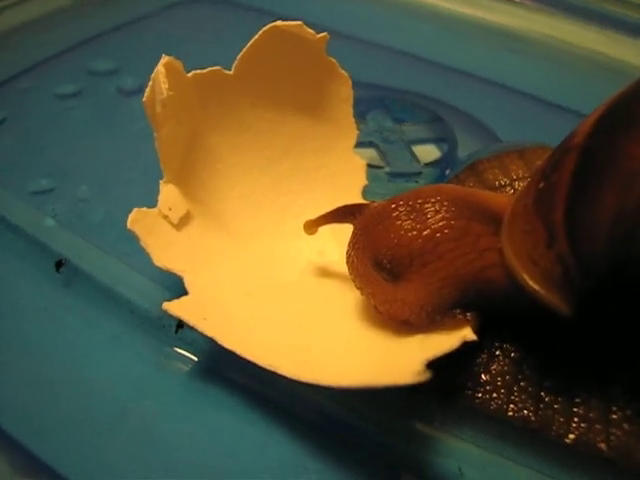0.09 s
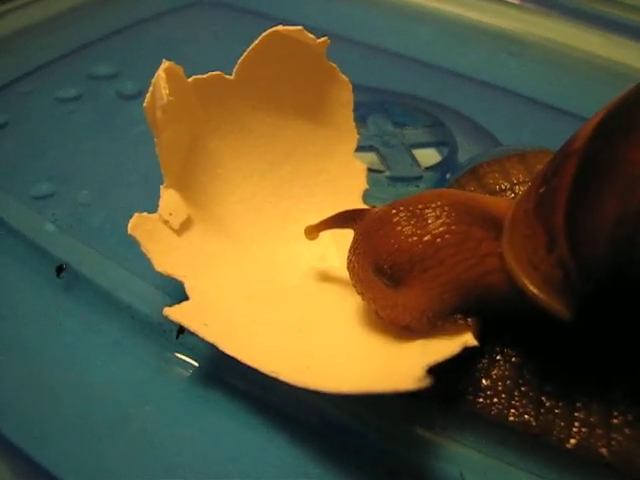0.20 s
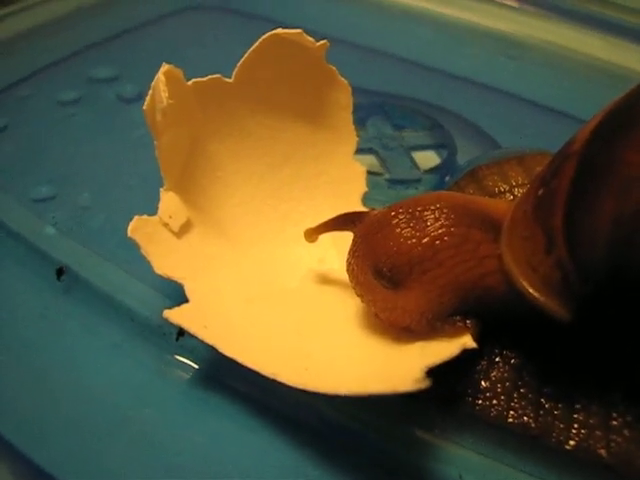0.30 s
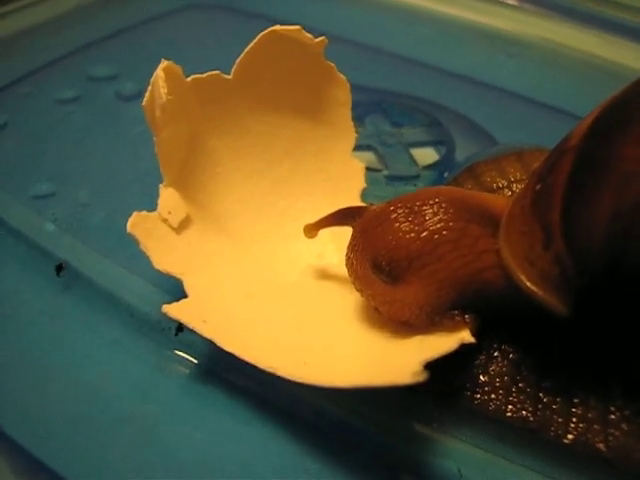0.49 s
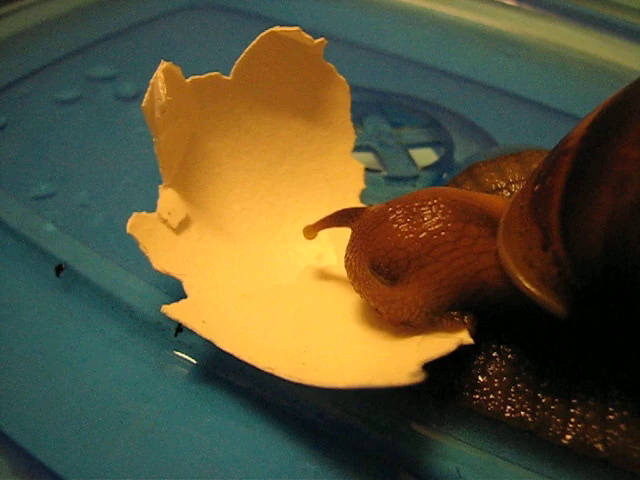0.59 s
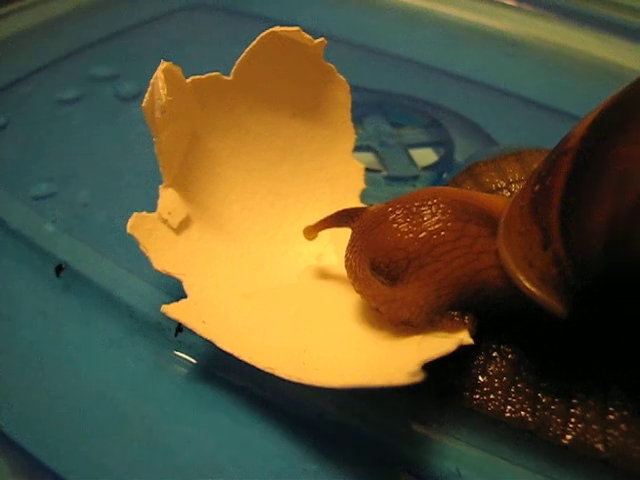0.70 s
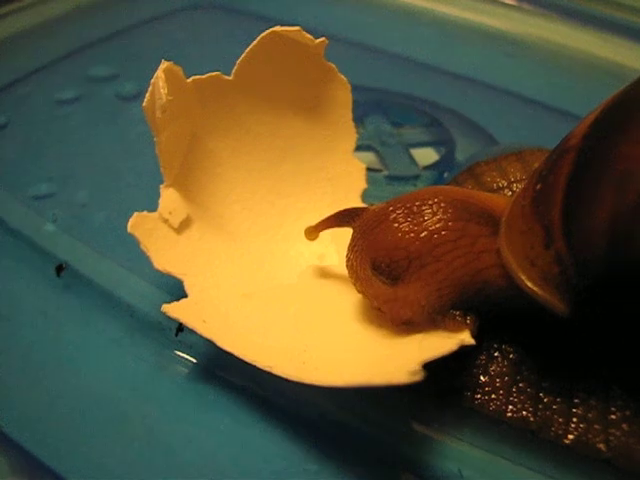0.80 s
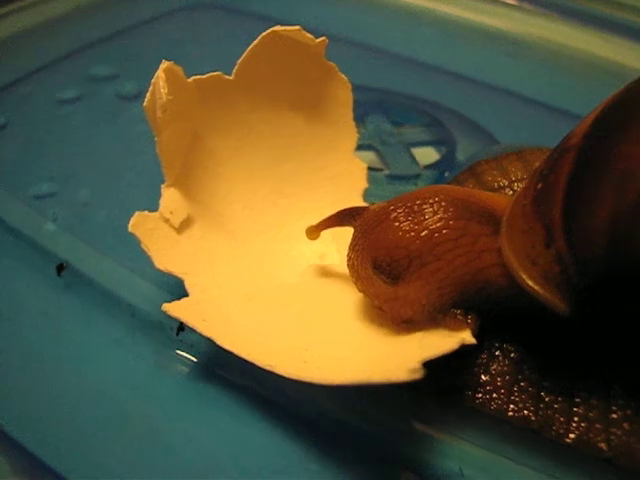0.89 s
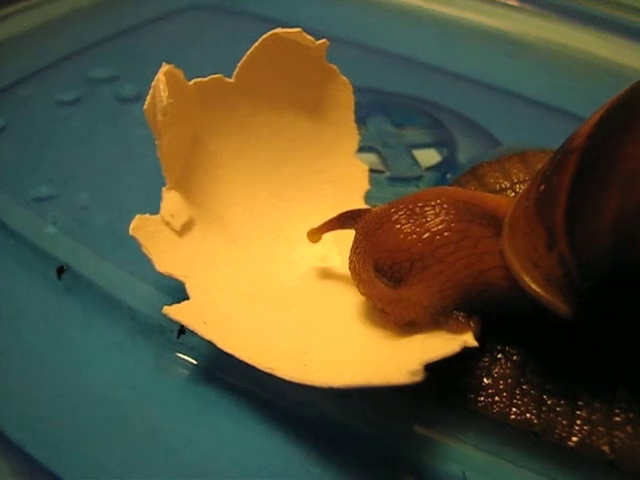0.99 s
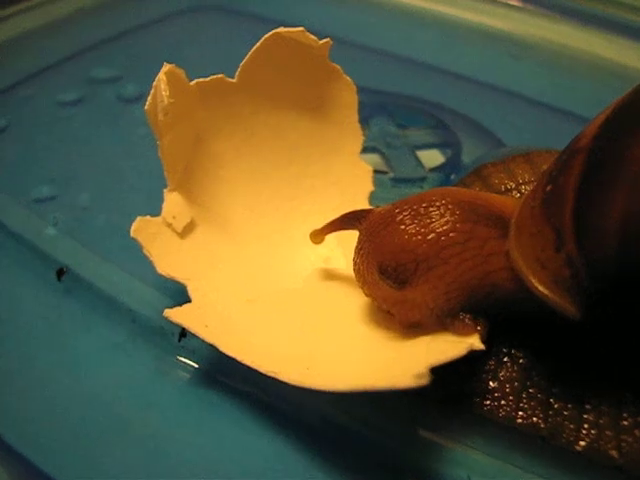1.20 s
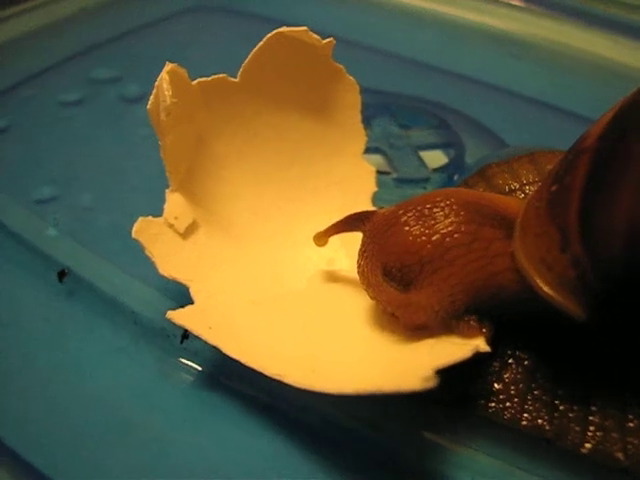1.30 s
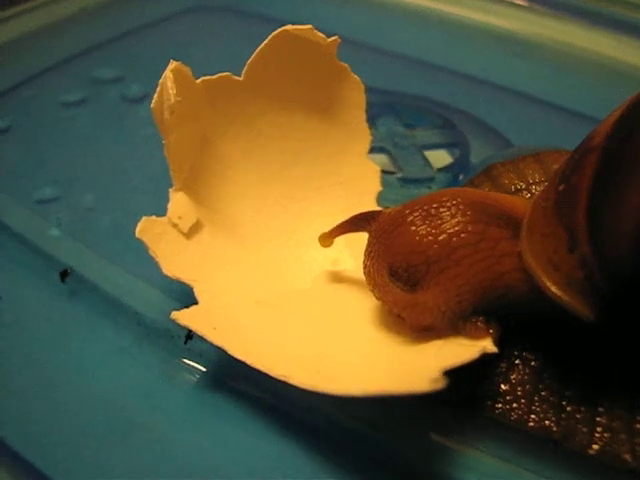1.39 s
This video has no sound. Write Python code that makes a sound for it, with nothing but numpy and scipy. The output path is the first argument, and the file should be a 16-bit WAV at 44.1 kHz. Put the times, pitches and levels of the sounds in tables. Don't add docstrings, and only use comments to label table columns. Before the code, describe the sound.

Close small-camera stereo sound of a snail scraping eggshell: faint motor ticks first, then a cluster of sharp brittle snaps with fine grit, hollow plastic taps, and near quiet with a late double click and soft thuds over hiss.

```python
import sys
import numpy as np
from scipy import signal
from scipy.fft import rfft, irfft
from scipy.io import wavfile

SR = 44100
rng = np.random.default_rng(int(sys.argv[2]) if len(sys.argv) > 2 else 0)


def put_to_file(sound):
    columns = np.atleast_2d(sound).T
    safe = np.clip(columns, -1, 1)
    whole_steps = np.round(safe * 32767)
    wavfile.write(sys.argv[1], SR, whole_steps.astype(np.int16))


def makeup_ratio(level_db):
    decades = np.asarray(level_db, float) / 20
    return 10 ** decades


N = 61740

# (frequency [Hz], level [dB], t60 [s], left-right [dB], left lead [rad])
SHELL_LOW = [(1720, -9, .02, -4, .8), (2130, -13, .01, -4, .8), (2850, -7, .007, -4, .8),
             (3300, -1, .008, -4, .8), (3850, -1, .006, -4, .8)]
SHELL_MID = [(4720, -1, .007, -3, .9), (5240, 0, .007, -3, .9)]
SHELL_MAIN = [(6090, -4, .008, -3.5, .95), (6280, 0, .009, -3.5, .95), (6490, -4, .008, -3.5, .95),
              (7180, -13, .005, -3, .95)]
SHELL_HIGH = [(9150, 0, .005, -3, .8), (10500, -3, .004, -1, 1.2), (12400, -6, .003, 4, 1.6),
              (14300, -8, .003, 4, 1.6)]


def evened(x):
    return x / np.sqrt(np.mean(x ** 2) + 1e-20)


def read(points, hz):
    f, value = np.transpose(points)
    return np.interp(np.log(hz + 1), np.log(f + 1), value)


def panned(left_right_db):
    return makeup_ratio(np.array([[0.5], [-0.5]]) * left_right_db)


def lead_left(rad):
    return np.exp(1j * np.array([[rad], [0]]))


def add(mix, s, sound):
    part = mix[:, round(s * SR):][:, :sound.shape[1]]
    part += sound[:, :part.shape[1]]


def cut(x, hz, kind):
    return signal.sosfilt(signal.butter(3, hz, kind, fs=SR, output="sos"), x)


def ring(modes, detune=0.004, spread_db=1.4):
    t = np.arange(4096) / SR
    out = 0
    for hz, db, t60_s, left_right_db, lead_rad in modes:
        off_pitch, off_level = rng.standard_normal(2)
        phase = 2 * np.pi * hz * (1 + detune * off_pitch) * t + np.array([[0.5], [-0.5]]) * lead_rad
        decay = makeup_ratio(db + spread_db * off_level - 60 * t / t60_s)
        out = out + panned(left_right_db) * decay * np.sin(phase)
    return out / np.sqrt(sum(makeup_ratio(mode[1]) ** 2 for mode in modes))


def hiss():
    # (frequency [Hz], density [dB per Hz])
    colour = [(15, -48), (25, -10.5), (238, -4), (409, -0.5), (481, -5), (6860, -14.5), (7860, -8),
              (8760, -14.5), (16400, -26)]
    # (frequency [Hz], correlation [0-1])
    likeness = [(60, 0.42), (240, 0.71), (950, 0.34), (3770, 0.24), (15000, 0.099)]
    # (frequency [Hz], left-right [dB])
    balance = [(60, 1), (3000, -0.5), (15000, 0)]
    hz = np.fft.rfftfreq(N, 1 / SR)
    left, other = rfft(rng.standard_normal((2, N)))
    same = read(likeness, hz)
    right = same * left + np.sqrt(1 - same ** 2) * other
    spectrum = np.array([left, right]) * makeup_ratio(read(colour, hz)) * panned(read(balance, hz))
    return makeup_ratio(-48.5) * evened(irfft(spectrum, N))


def hum():
    # (centre [Hz], width [Hz], level [dB], left-right [dB])
    resonances = [(99, 51, -65.5, -4), (398.6, 56, -63.5, 16), (598, 24, -72.5, 19), (1000, 290, -64, -4),
                  (6330, 220, -77.5, -17), (8300, 420, -75, 0)]
    hz = np.fft.rfftfreq(N, 1 / SR)
    out = 0
    for centre_hz, width_hz, db, left_right_db in resonances:
        band = rfft(rng.standard_normal(N)) / (1 + (2 * (hz - centre_hz) / width_hz) ** 2)
        out = out + makeup_ratio(db) * panned(left_right_db) * evened(irfft(band, N))
    return out


def whine():
    pictures_per_s, flip_s, late_s = 30 / 1.001, 0.0226, 0.0172
    lower_hz, upper_hz, buzz_hz, buzz_t60_s = 7867.15, 8265, 8620, 0.006
    t = np.arange(N) / SR

    def flips(start_s):
        return np.tanh(np.sin(np.pi * pictures_per_s * (t - start_s)) / 0.03)

    lower = flips(flip_s) * makeup_ratio(-47) * panned(-2.2) * np.sin(2 * np.pi * lower_hz * t)
    late = flips(flip_s + late_s)
    turn = np.exp(2j * np.pi * upper_hz * t)
    upper = makeup_ratio(-55.3) * late * turn * lead_left(3.9)
    short_t = t[:900]
    strike = makeup_ratio(-50.5 - 60 * short_t / buzz_t60_s) * np.exp(2j * np.pi * buzz_hz * short_t)
    buzz = signal.fftconvolve(np.gradient(np.sign(late)) * turn, strike)[:N] * lead_left(2.4)
    return lower + (upper + buzz).real


def drag():
    # (time [s], level [dB])
    loudness = [(0.0, -49.5), (0.288, -49.5), (0.42, -46), (0.466, -42), (0.612, -50), (0.69, -46.5),
                (0.838, -83), (1.4, -82)]
    grains_per_s, spread_db = 1500, 3.5
    strength = makeup_ratio(spread_db * np.minimum(rng.exponential(1, N), 3))
    grit = strength * (rng.random(N) < grains_per_s / SR) * rng.choice([-1, 1], N)
    shell = ring(SHELL_MAIN) + ring(SHELL_LOW + SHELL_MID) + makeup_ratio(-9.5) * ring(SHELL_HIGH)
    scrape = evened(signal.fftconvolve(shell, grit[None], axes=1)[:, :N])
    s, db = np.transpose(loudness)
    return scrape * makeup_ratio(np.interp(np.arange(N) / SR, s, db) - 4)


def motor_ticks():
    # (time [s], level [dB])
    steps = [(.002, -37.5), (.105, -40.5), (.202, -36), (.301, -40), (.402, -35), (.503, -48.5),
             (.598, -46.5), (.721, -40), (1.052, -42.5)]
    # (frequency [Hz], level [dB], t60 [s], left-right [dB], left lead [rad])
    case_modes = [(392.6, 0, 0.086, 8.1, 0.14), (590, -9.5, 0.032, 0.91, 0.82)]
    rise_s = 0.003
    rise = np.minimum(np.arange(4096) / SR / rise_s, 1)
    out = np.zeros((2, N))
    for s, db in steps:
        add(out, s, makeup_ratio(db) * rise * ring(case_modes))
    return out


def sharp_edges():
    # (time [s], level [dB], top [dB])
    cracks = [(.0218, -50, -6), (.3901, -33, 10), (.4485, -37, -6), (.6117, -29, 12), (.6134, -31, 12),
              (.6916, -44, -8), (.7381, -31, -7), (.7787, -25, 3), (1.051, -44, -6), (1.1132, -42, -10)]
    # (frequency [Hz], level [dB], t60 [s], left-right [dB], left lead [rad])
    body = [(1750, -2, .004, -6, 1), (2300, -2, .004, -5, .8), (3250, 0, .004, -5, .8)]
    top = [(4200, -1, .003, -3, .9), (5300, 0, .003, -3, .9), (6800, 0, .003, -3, .9),
           (10500, -11, .0015, -2, 1)]
    out = np.zeros((2, N))
    for s, db, top_db in cracks:
        add(out, s, -makeup_ratio(db) * (ring(body) + makeup_ratio(top_db) * ring(top)))
    return out


def tray_knocks():
    # (time [s], level [dB], brightness [dB])
    blows = [(0.0226, -36.5, 3), (0.391, -50.5, 6), (0.5104, -48, -3), (0.6161, -46, 9), (0.6357, -47, 11),
             (0.6471, -50, 12.5), (0.6672, -41, 11), (0.6923, -36, 6.5), (0.7014, -53, 12.5),
             (0.71, -49, 9), (0.7203, -53, 12.5), (0.7384, -34, 8), (0.7786, -30.5, 8), (1.051, -51, 9.5),
             (1.249, -64, 7)]
    # (frequency [Hz], level [dB], t60 [s], left-right [dB], left lead [rad])
    dull = [(163, -0.5, 0.02, -24, 0.15), (405.2, -0.5, 0.12, 12.5, 1), (603, 8.5, 0.068, 3.5, 0.91)]
    bright = [(995, 0, .042, -9, 1.5), (1095, -3, .035, -9, 1.5), (1380, -7, .022, -10, 1.5),
              (770, -14, .011, -6, 1.2)]
    out = np.zeros((2, N))
    for s, db, bright_db in blows:
        add(out, s, -makeup_ratio(db - 1) * (ring(dull) + makeup_ratio(bright_db - 1.5) * ring(bright)))
    return out


def slip(level_db, low_db, mid_db, high_db):
    trail_s, contact_s = 0.0006, 0.00027
    t = np.arange(200) / SR
    burst = 0.2 * rng.standard_normal(200) * (rng.random(200) < 0.3) * np.exp(-t / trail_s)
    burst[0] = 1
    soft = 1 - np.exp(-(np.arange(1500) / SR / contact_s) ** 2)
    families = [(SHELL_MAIN, 0, 0.004, 1.4), (SHELL_LOW, low_db + 0.3, 0.012, 2),
                (SHELL_MID, mid_db, 0.012, 2), (SHELL_HIGH, high_db - 1.6, 0.012, 2)]
    out = 0
    for modes, db, detune, spread_db in families:
        rung = soft * ring(modes, detune, spread_db)[:, :1500]
        part = signal.fftconvolve(rung, burst[None], axes=1)
        onset_rms = np.sqrt(np.mean(part.mean(0)[:88] ** 2))
        out = out + makeup_ratio(db) * part / onset_rms
    return makeup_ratio(level_db - 2) * out


def rasp_slips():
    # (time [s], level [dB], low modes [dB], middle modes [dB], high modes [dB])
    strong = [(0.2346, -22, -13, -16, -14), (0.2795, -29.5, -16, -13, -13), (0.3127, -26.3, -19, -12, -22),
              (0.3451, -22, -15, -17, -19), (0.39, -26, -2, 2, -4), (0.3914, -28, -9, -6, -12),
              (0.3928, -28, -14, -14, -20), (0.4248, -30, -13, -14, -13), (0.4481, -29.2, -4, -10, -8),
              (0.4703, -27.8, -11, -18, -13), (0.4732, -33, -14, -19, -17), (0.4766, -23.4, -15, -18, -15),
              (0.5087, -21.7, -12, -21, -18), (0.5149, -26.8, -15, -18, -20),
              (0.5454, -26.3, -16, -13, -12), (0.5842, -29.7, -8, -14, -15), (0.6097, -14.5, -11, -12, -16),
              (0.6116, -19.5, -4, -2, -9), (0.6134, -17.5, -11, -8, -16), (0.6279, -23, -12, -10, -15),
              (0.6293, -22.5, -21, -15, -18), (1.1036, -28.5, -14, -14, -20), (1.1116, -35, -10, -8, -14),
              (1.113, -31.2, -7, -11, -16)]
    # (time [s], level [dB])
    faint = [(0.1871, -50), (0.2231, -34), (0.2399, -54), (0.2422, -43), (0.249, -43), (0.2541, -35),
             (0.2668, -35), (0.3006, -48), (0.3059, -33), (0.3084, -37.5), (0.3158, -34), (0.3184, -37.7),
             (0.3216, -47), (0.325, -48), (0.3269, -38.6), (0.3302, -47), (0.3398, -44), (0.3506, -37),
             (0.3547, -38), (0.3747, -45), (0.4029, -38), (0.4606, -53), (0.4657, -59), (0.4975, -33)]
    stray = [(0.5037, -52), (0.5225, -41), (0.5565, -32), (0.5614, -39), (0.6229, -44), (0.6359, -44),
             (0.6412, -43), (0.6553, -38), (0.7452, -41), (0.8612, -46), (0.9252, -44), (1.0328, -44),
             (1.043, -46), (1.06, -48), (1.069, -50), (1.198, -49)]
    early_s = 0.0001
    out = np.zeros((2, N))
    for s, *levels in strong:
        add(out, s - early_s, slip(*levels))
    for s, db in list(faint) + list(stray):
        add(out, s - early_s, slip(db - 0.7, -6, -5, -9.5))
    return out


def soft_bumps():
    # (time [s], level [dB], pitch [Hz])
    nudges = [
        (1.055, -41, 135),
        (1.27, -45, 169),
        (1.348, -41, 280),
    ]
    out = np.zeros((2, N))
    for s, db, hz in nudges:
        add(out, s, makeup_ratio(db) * ring([(hz, 0, 0.045, -12.5, 0.3)]))
    return out


def near_walls(x):
    t60_s, gap_s = 0.06, 0.002
    t = np.arange(6000) / SR
    tail = rng.standard_normal((2, 6000)) * makeup_ratio(-60 * t / t60_s) * (t > gap_s)
    return signal.fftconvolve(x, tail / np.linalg.norm(tail[0]), axes=1)[:, :N]


def scene():
    shell = cut(drag() + rasp_slips(), 1450, "high")
    contacts = cut(motor_ticks() + sharp_edges() + tray_knocks() + soft_bumps(), 90, "high")
    near = cut(shell + contacts, 15600, "low")
    return near + makeup_ratio(-20) * near_walls(near) + hiss() + hum() + whine()


def roll_off(x):
    return signal.sosfilt(signal.butter(12, 16500, fs=SR, output="sos"), x)


def record(dry):
    edge = signal.firwin(255, 16200, window=("kaiser", 9), fs=SR)
    mix = signal.oaconvolve(dry, edge[None], "same")
    return roll_off(mix)


dry = scene()
out = record(dry)
put_to_file(out)
```